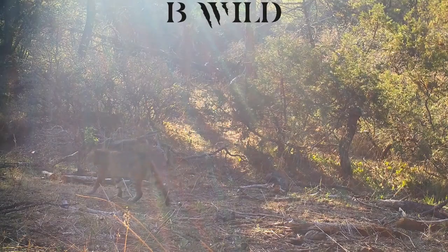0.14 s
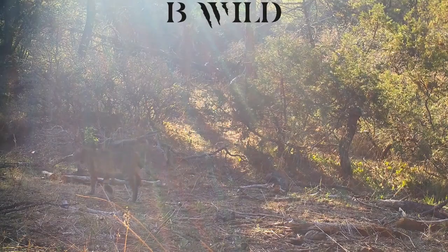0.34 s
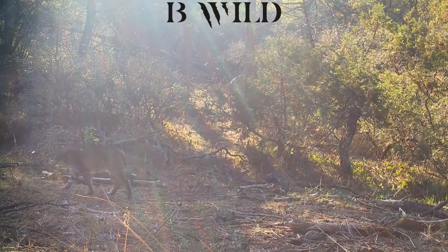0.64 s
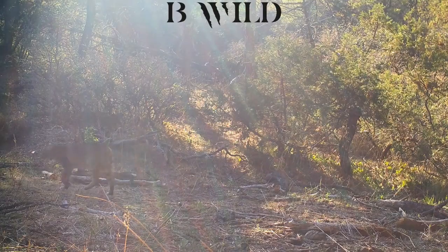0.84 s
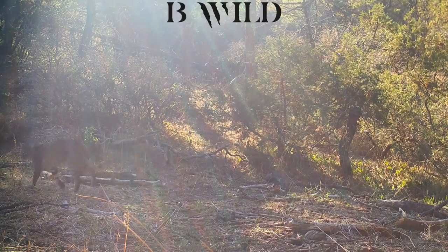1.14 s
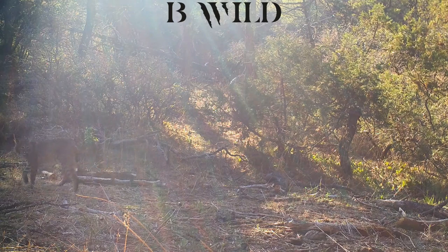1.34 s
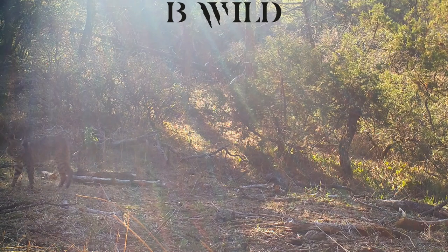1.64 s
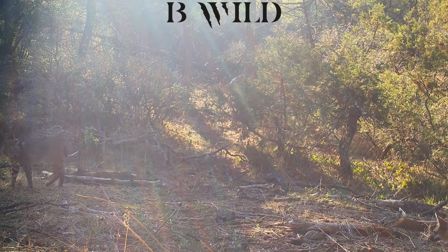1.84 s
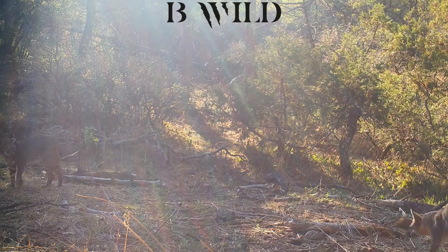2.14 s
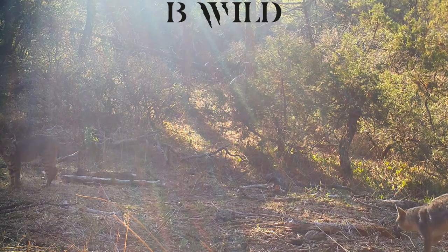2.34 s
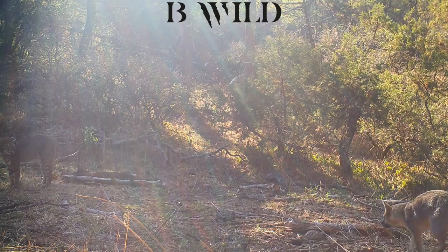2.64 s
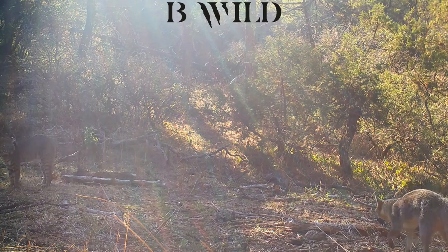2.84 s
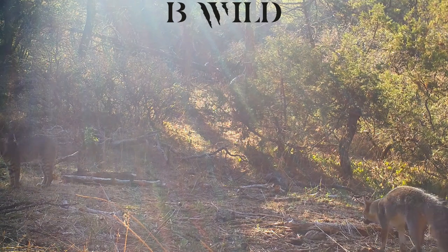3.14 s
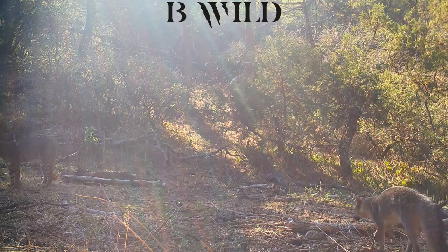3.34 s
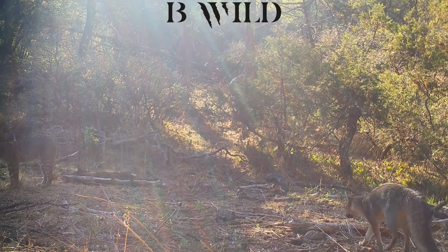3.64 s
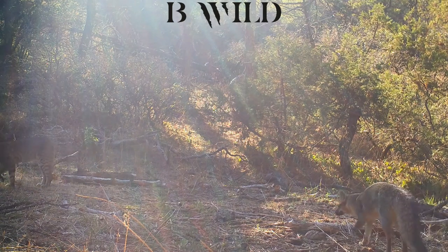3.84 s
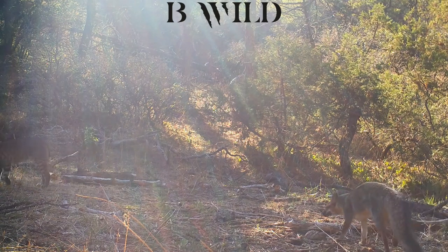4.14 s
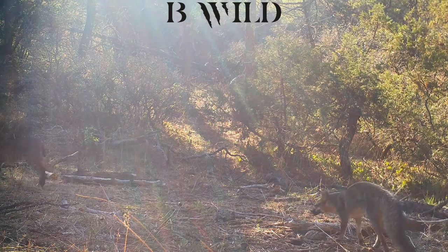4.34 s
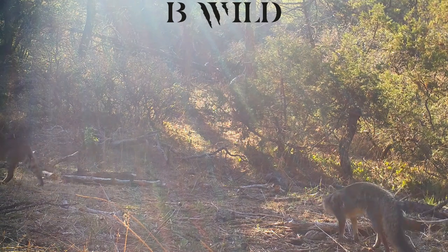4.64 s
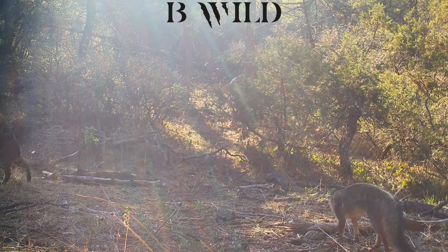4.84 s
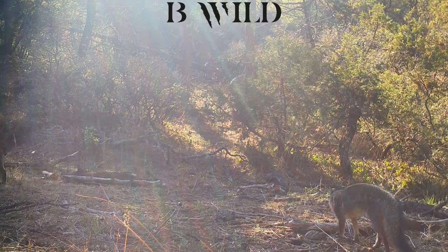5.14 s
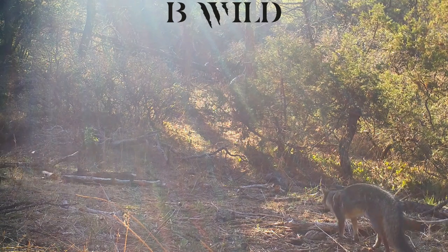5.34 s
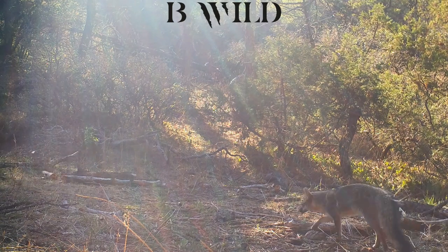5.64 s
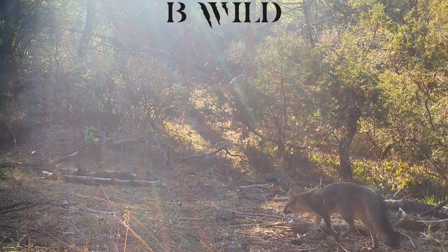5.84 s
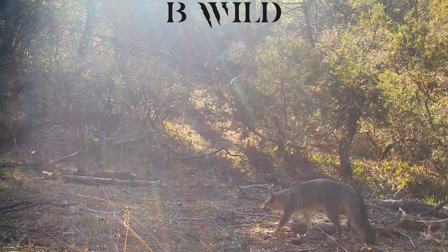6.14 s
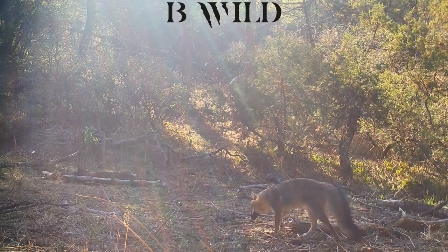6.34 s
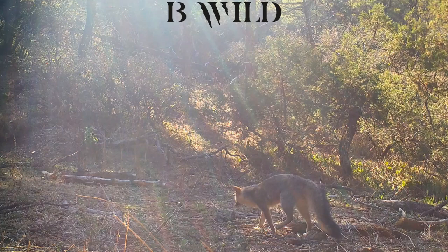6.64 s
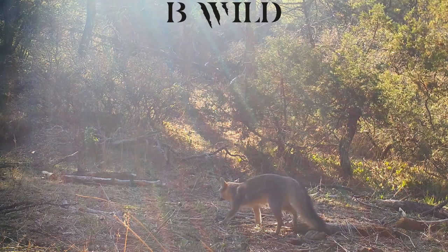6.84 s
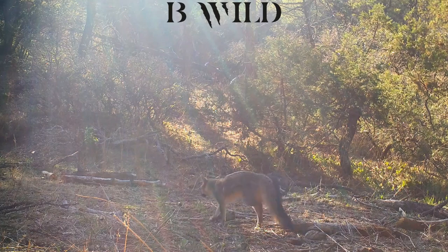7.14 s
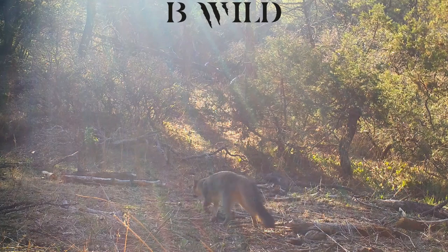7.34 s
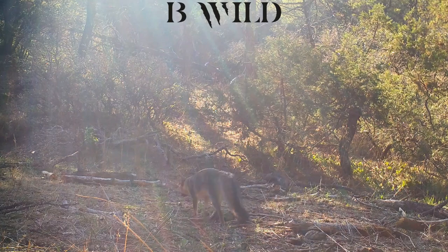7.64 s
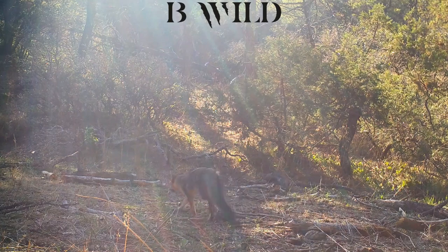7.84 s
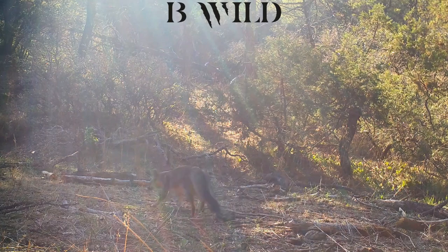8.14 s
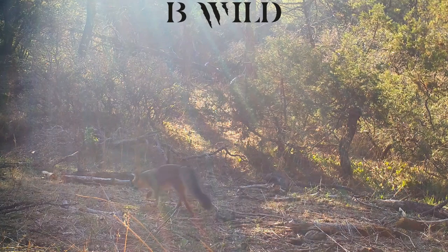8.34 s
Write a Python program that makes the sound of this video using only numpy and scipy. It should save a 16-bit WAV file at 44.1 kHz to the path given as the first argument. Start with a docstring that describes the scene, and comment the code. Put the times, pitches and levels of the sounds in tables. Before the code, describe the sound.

From the first instant a jay shrieks in quick, harsh, rising bursts, each about a tenth of a second, roughly three per second with a few longer gaps. Trees return a short diffuse echo. Beneath lies faint woodland air and a barely audible high electric whine from a fixed outdoor camera microphone. A tiny distant bird chips a few times. The foxlike animals walking past make no clear footsteps.

```python
"""Short jay shrieks, from the first moment, over the hush of open woodland and a thin electric whine.
In each shriek one voice sweeps upward; a second, steadier voice and a fast flutter roughen it.
Nearby surfaces colour the call, and trunks answer with decaying, filtered noise as a tail.
Later come dull low swells of noise, falling sine chips from a small far bird and a twig tick of noise.
The whine is a sine with flipping sign, leaked by the image sensor of a fixed field camera."""
import sys
import numpy as np
from scipy import signal
from scipy.fft import rfft, irfft, next_fast_len
from scipy.io import wavfile
from scipy.ndimage import uniform_filter1d, map_coordinates

SR = 44100
rng = np.random.default_rng(int(sys.argv[2]) if len(sys.argv) > 2 else 0)


def volts_from_db(level):
    """Convert decibel levels to linear amplitude ratios."""
    exponent = np.asarray(level, float) / 20
    return 10 ** exponent


def digitize_waveform(pressure):
    """Quantize a signal to 16-bit integers and store it at the path in sys.argv[1].

    Rows of a 2-D input are taken as channels; values are limited to [-1, 1].
    """
    field = np.atleast_2d(pressure).T
    bounded = np.clip(field, -1, 1)
    quanta = np.round(bounded * 32767).astype(np.int16)
    wavfile.write(sys.argv[1], SR, quanta)


N = 374409  # samples

# jay calls: (start [s], length [s], level [dB], pitch near the end [Hz], moment of the peak [fraction of length])
SHRIEKS = [(-0.061, 0.14, -17.5, 3031, 0.7), (0.206, 0.13, -17.5, 3042, 0.66),
           (0.473, 0.12, -16.5, 3130, 0.89), (0.772, 0.12, -15.5, 3290, 0.8),
           (1.085, 0.12, -17, 3040, 0.78), (1.613, 0.11, -16, 3142, 0.87), (1.886, 0.12, -15.5, 3240, 0.79),
           (2.257, 0.12, -15.5, 3135, 0.84), (2.532, 0.12, -16.5, 3123, 0.67),
           (2.821, 0.12, -16, 3132, 0.78), (3.071, 0.12, -14.5, 3138, 0.81), (3.351, 0.12, -16, 3180, 0.8),
           (3.633, 0.12, -16, 3488, 0.56), (3.928, 0.1, -15.5, 3883, 0.4), (4.218, 0.096, -16, 3662, 0.85),
           (4.53, 0.1, -16.5, 3690, 0.36), (4.834, 0.102, -15.5, 3753, 0.8),
           (5.343, 0.091, -16, 3183, 0.92), (5.641, 0.12, -17.5, 3173, 0.81), (5.999, 0.13, -16, 3290, 0.7),
           (6.295, 0.11, -15.5, 3027, 1), (6.599, 0.11, -16, 3180, 0.77), (6.917, 0.12, -16, 3172, 0.73),
           (7.258, 0.12, -16.5, 3010, 0.79), (7.624, 0.12, -16.5, 3197, 0.8)]
# multiples 1 to 4 of the sweeping voice, before the overtone fade: (level [dB])
HARMONICS_DB = [0, -2.5, -6.5, -18.5]
# side tones around the sweeping voice: (offset [multiples of the second voice])
SIDE_STEPS = [-2, -1, -.5, .5, 1, 2]
# the same side tones, before the lift and closing of a call: (level [dB])
SIDE_DB = [-24.5, -10.5, -5, -5, -9.5, -20.5]
# throat resonance: (frequency [Hz], relative gain [dB])
THROAT = [(300, -59), (900, -22.5), (1300, -12.5), (2000, -8.5), (3100, 2), (3800, -1), (4400, -10),
          (5400, -13), (7000, -26.5), (9000, -38.5), (16000, -61.5)]
# narrow bands cancelled or lifted by nearby trunks and ground: (centre [Hz], width [Hz], gain [dB])
NEARBY_BANDS = [(1673, 37, 3), (1905, 51, 3.5), (2005, 35, 6), (2450, 62, 2.5), (2860, 170, -3.5),
                (2982, 78, 5), (3180, 44, -1), (4240, 20, -1), (4980, 100, -1.5), (5950, 80, -4),
                (6730, 100, -5)]
# decay of the far trunks' echo: (frequency [Hz], T60 [s])
FAR_DECAY = [(1000, .5), (2000, 0.94), (3200, 0.65), (4700, 0.71), (7000, 0.35), (12000, 0.13)]
# echo colour: (frequency [Hz], relative gain [dB])
ECHO_COLOUR = [(1000, 1), (2400, -1), (3400, 2), (4800, -3.5), (6500, 0), (12000, -18)]
# spectrum of wind and air: (frequency [Hz], relative density [dB per Hz])
HUSH_SPECTRUM = [(15, -46.5), (25, -22), (60, -16), (123, -12), (249, -7.5), (575, -3.5), (900, -2.5),
                 (1500, -4.5), (3200, -11), (4300, -22), (5700, -32.5), (7000, -37), (16000, -38)]
# moments when the whine stumbles: (time [s])
WHINE_STUMBLES = [5.865, 7.145, 8.275]
# low swells: (middle [s], peak rms level [dB], spread [s])
RUMBLE_SWELLS = [(1.93, -71, 0.14), (2.6, -77.5, 0.44), (3.7, -78, .25)]
# far bird: (start [s], level [dB], settled pitch [Hz])
CHIPS = [(2.9894, -69, 5630), (3.289, -52, 5630), (4.797, -51.5, 5700), (7.8855, -61, 5660)]
# twig: (start [s], level [dB])
TICKS = [(8.376, -54)]

START_HZ, SECOND_VOICE_HZ, FLUTTER_HZ = 1243.4, 944, 187.6
# overtones and breath: gain of a usual call, and its loss per kHz of end pitch above the usual
OVERTONE_DB, PURER_DB_PER_KHZ, USUAL_END_HZ = 1.36, 6, 3170
HUSH_RMS_DB = -57
WHINE_HZ, WHINE_FLIPS_PER_S, WHINE_PEAK_DB = 7797.3, 59.25, -73.5
BAND_LIMIT_HZ = 15720


def unit(x):
    """Scales to rms 1."""
    return x / np.sqrt(np.mean(x ** 2) + 1e-20)


def along(points, hz):
    """Interpolates (frequency [Hz], value) points on a log frequency axis."""
    point_hz, values = np.transpose(points)
    return np.interp(np.log(hz + 1), np.log(point_hz + 1), values)


def filtered(x, gain):
    """Multiplies the spectrum by gain(hz)."""
    size = next_fast_len(len(x) + SR // 4)
    return irfft(rfft(x, size) * gain(np.fft.rfftfreq(size, 1 / SR)), size)[:len(x)]


def drift(size, hz):
    """Smooth random signal of rms 1 that changes about hz times a second."""
    knots = rng.standard_normal(size)
    return unit(map_coordinates(knots, [np.arange(size) * hz / SR]))


def opening_beak(x, length_s, end_hz):
    """A closed beak passes low sound; as it opens the call's lower edge climbs, further in high calls."""
    hz, t, z = signal.stft(x, SR, nperseg=256, noverlap=192)
    edge_hz = np.interp(t / length_s, [0, .2, .55, 1], [800, 1250, 0.59 * end_hz, 0.69 * end_hz])
    below_db = np.clip(60 * np.log2((hz[:, None] + 1) / edge_hz), -24, 0)
    return signal.istft(z * volts_from_db(below_db), SR, nperseg=256, noverlap=192)[1][:len(x)]


def shriek(length_s, end_hz, overtone_db, peak):
    """Two voices mix, flutter and rasp, then pass beak and throat; peak level near 1."""
    t = np.arange(SR // 5) / SR
    u = t / length_s
    peak = np.clip(peak, .45, .95)
    swell_db = np.interp(u, [0, .12, .4, peak, 1, 1.06], [-26.5, -14.5, -3.5, -0.5, -10.0, -38.5])
    swell = volts_from_db(swell_db) * (u < 1.1)
    # clearer at both ends and in high calls
    rough = np.interp(u, [0, .25, .7, .9], [.4, 1, .9, .5]) * (3100 / end_hz) ** 2.5

    sweep = np.interp(u, [0, .35, .8, 1], [0, .35, 1, 1.01])
    pitch_hz = START_HZ + (end_hz - START_HZ) * sweep + 170 * rough * drift(len(t), hz=600.0)
    second_hz = SECOND_VOICE_HZ + 130 * rough * drift(len(t), hz=300.7)
    sweep_rad, second_rad = 2 * np.pi * np.cumsum([pitch_hz, second_hz], axis=1) / SR

    fade_db = overtone_db - 16 * u ** 2  # overtones thin out through the call
    voice = 0
    for k, db in enumerate(HARMONICS_DB):
        voice = voice + volts_from_db(db + fade_db * (k > 0)) * np.exp(1j * (k + 1) * sweep_rad)

    closing_db = np.interp(u, [.75, .95], [0, -5.5])  # side tones sink under the main note
    # high calls: strong upper strand, weak lower ones
    lift_db = 11 * u * np.clip((end_hz - 3200) / 500, 0, 1)
    mixing = 1
    for step, db in zip(SIDE_STEPS, SIDE_DB):
        side_db = db + lift_db * ((step == 1) - .5 * (step < 0)) + closing_db
        start_rad = rng.uniform(0, 2 * np.pi)
        mixing = mixing + volts_from_db(side_db) * np.exp(1j * (step * second_rad + start_rad))

    second_octave = volts_from_db(-13.0) * np.exp(2j * second_rad)
    rasp = 1 + 0.33 * rough * (drift(len(t), hz=1185.4) + 1j * drift(len(t), hz=1194))
    breath = volts_from_db(-2.0 + 1.2 * overtone_db - 3.4 * u ** 2) * rng.standard_normal(len(t))

    # flutter shuts the voice at first, later only in part
    depth = np.clip(0.22 + 0.87 * np.exp(-t / 0.024), 0, 1)
    flutter_cycles = np.cumsum(FLUTTER_HZ + 40 * u * drift(len(t), hz=119)) / SR
    flutter = (1 - depth * np.cos(np.pi * flutter_cycles) ** 2) ** 1.21

    source = np.real((voice * mixing + second_octave) * rasp) + breath
    beak = opening_beak(swell * flutter * source, length_s, end_hz)
    # the second voice also leaks through the neck
    neck = volts_from_db(-18.5) * swell * flutter * np.real(np.exp(1j * second_rad) * rasp)
    out = filtered(beak + neck, lambda hz: volts_from_db(along(THROAT, hz)))
    return out / np.sqrt(np.max(uniform_filter1d(out ** 2, size=900)) * 2)


def wood(x, wet_db):
    """Direct sound coloured by nearby surfaces, quick scatter off near trunks, slow tail off far ones."""
    hz, t, z = signal.stft(rng.standard_normal(SR), SR, nperseg=256)
    near = volts_from_db(14.0 - 60 * t / 0.12)
    far = volts_from_db(-60 * t / along(FAR_DECAY, hz)[:, None])
    colour = volts_from_db(along(ECHO_COLOUR, hz))[:, None]
    tail = signal.istft(z * colour * (near + far), SR, nperseg=256)[1][:SR]
    tail *= 1 - np.exp(-np.arange(SR) / SR / 0.0029)  # soft onset
    tail *= volts_from_db(wet_db) / np.linalg.norm(tail)

    def bands_db(hz):
        return sum(db * np.exp(-((hz - centre) / width) ** 2 / 2) for centre, width, db in NEARBY_BANDS)

    out = signal.fftconvolve(filtered(x, lambda hz: volts_from_db(0.8 * bands_db(hz))), tail)
    out[:len(x)] += filtered(x, lambda hz: volts_from_db(bands_db(hz)))
    return out


def jay():
    """All shrieks, each in its own scatter of echoes; higher calls are purer."""
    out = np.zeros(N + 3 * SR)  # 1 s lead-in: the first call starts before 0
    for start_s, length_s, db, end_hz, peak in SHRIEKS:
        overtone_db = OVERTONE_DB - PURER_DB_PER_KHZ * max(end_hz - USUAL_END_HZ, 0) / 1000
        call = wood(shriek(length_s, end_hz, overtone_db, peak), wet_db=-10.5)
        out[SR + round(start_s * SR):][:len(call)] += volts_from_db(db) * call
    return out[SR:SR + N]


def hush():
    """Far wind and air: steady noise, mostly low."""
    noise = filtered(rng.standard_normal(N), lambda hz: volts_from_db(along(HUSH_SPECTRUM, hz)))
    return volts_from_db(HUSH_RMS_DB) * unit(noise)


def whine():
    """The image sensor leaks a tone whose sign flips at every frame; its phase stumbles at set moments."""
    t = np.arange(N) / SR
    stumble = sum(np.exp(-((t - s) / .012) ** 2) for s in WHINE_STUMBLES)
    flips = np.tanh(120 * np.sin(np.pi * WHINE_FLIPS_PER_S * t))
    phase_rad = 2 * np.pi * WHINE_HZ * t + 2 * stumble * drift(N, hz=250)
    return volts_from_db(WHINE_PEAK_DB) * flips * np.sin(phase_rad)


def rumble():
    """A faint dull band of noise under a few Gaussian swells."""
    t = np.arange(N) / SR
    band = [(30, -120), (70, -31), (150, 2.0), (220, -1), (420, -30.0), (1500, -120)]  # (Hz, dB)
    noise = unit(filtered(rng.standard_normal(N), lambda hz: volts_from_db(along(band, hz))))
    swells = sum(volts_from_db(db) * np.exp(-((t - s) / spread_s) ** 2 / 2) for s, db, spread_s in RUMBLE_SWELLS)
    return swells * noise


def small_bird():
    """Short sine chips of falling, slightly rough pitch, echoed by the wood."""
    out, t = np.zeros(N + 2 * SR), np.arange(SR // 50) / SR
    for start_s, db, hz in CHIPS:
        pitch_hz = hz * (1 + .12 * np.exp(-t / .002)) + 180 * drift(len(t), hz=900)
        envelope = volts_from_db(-60 * t / .08) * np.sin(np.pi * t / t[-1]) ** .5
        chip = wood(np.sin(2 * np.pi * np.cumsum(pitch_hz) / SR) * envelope, wet_db=-10)
        out[round(start_s * SR):][:len(chip)] += volts_from_db(db) * chip
    return out[:N]


def twig():
    """A dry tick: a few milliseconds of decaying, band-shaped noise."""
    out, t = np.zeros(N + SR), np.arange(SR // 50) / SR
    for start_s, db in TICKS:
        out[round(start_s * SR):][:len(t)] += volts_from_db(db - 60 * t / .012) * rng.standard_normal(len(t))
    band = [(1500, -18), (3500, 5.0), (6000, 0.5), (11000, -36)]  # (Hz, dB)
    return filtered(out[:N], lambda hz: volts_from_db(along(band, hz)))


def scene():
    """Jay, hush, rumble, small bird and twig in one channel."""
    return (jay() + hush() + rumble() + small_bird() + twig())[None]


def top_cut(x):
    """Nothing passes above the cut-off."""
    return signal.sosfilt(signal.butter(12, 15720, fs=SR, output="sos"), x)


def record(dry):
    """The camera adds its whine and keeps nothing above its band limit."""
    padded = np.pad(dry[0] + whine(), SR, "reflect")
    heard = filtered(padded, lambda hz: hz < BAND_LIMIT_HZ)[None, SR:-SR]
    return top_cut(heard)


dry = scene()
out = record(dry)
digitize_waveform(out)
```